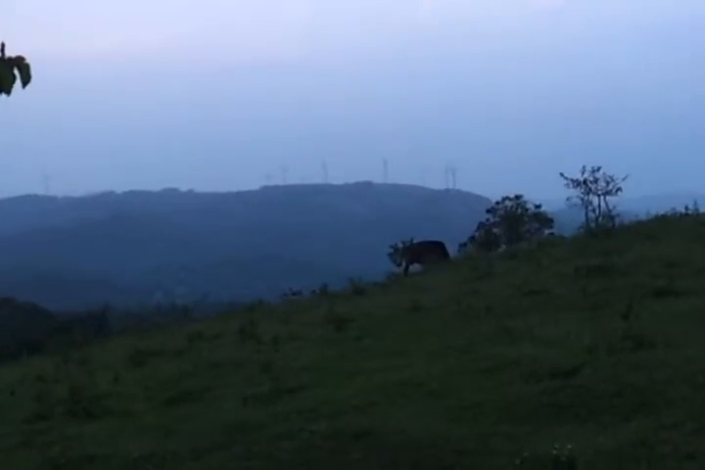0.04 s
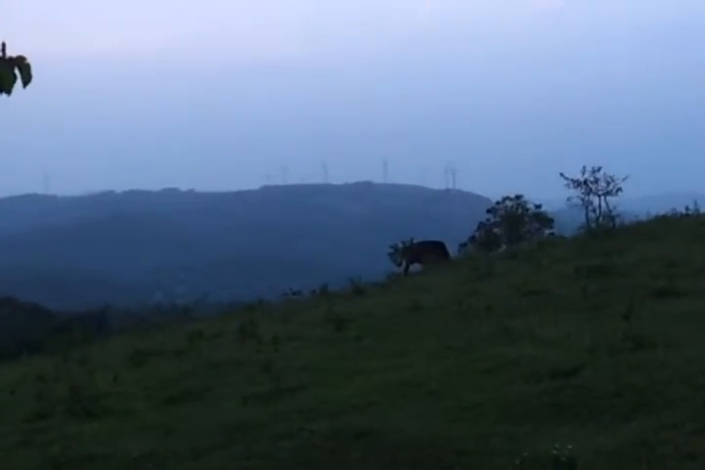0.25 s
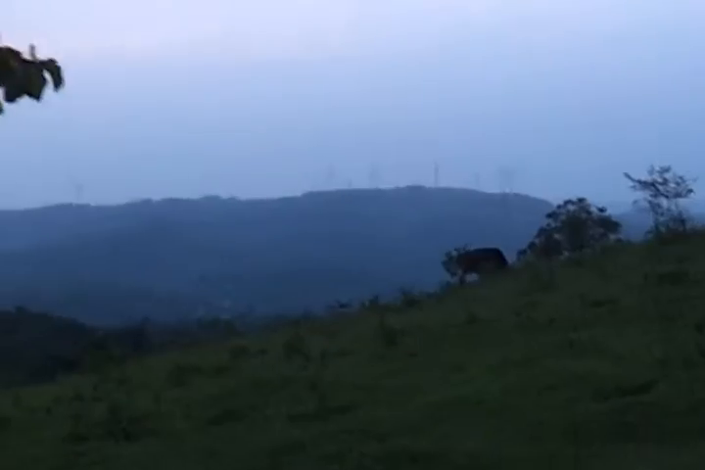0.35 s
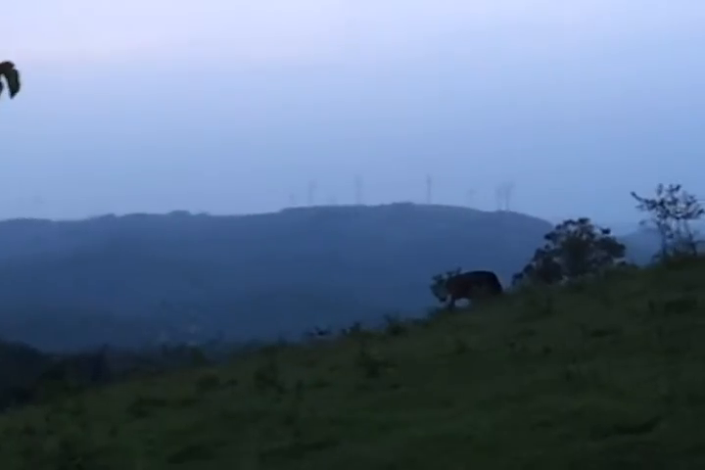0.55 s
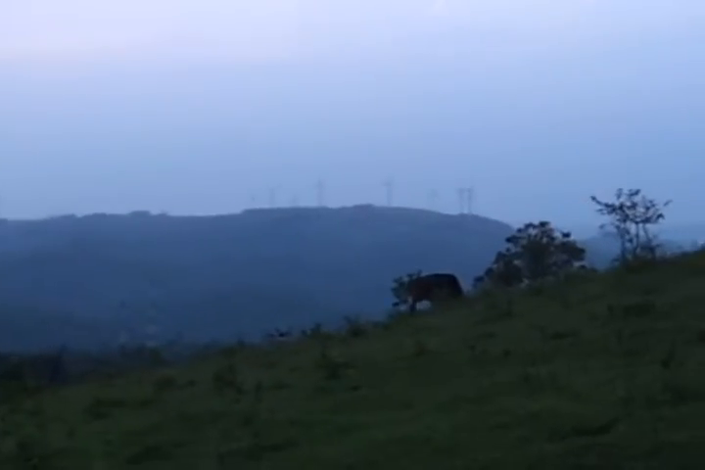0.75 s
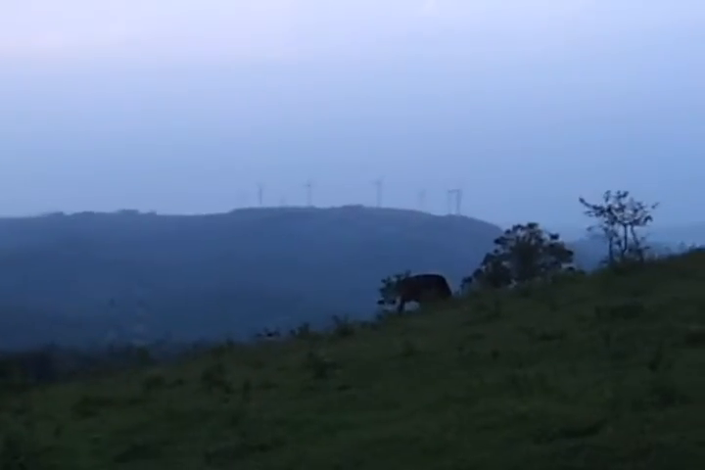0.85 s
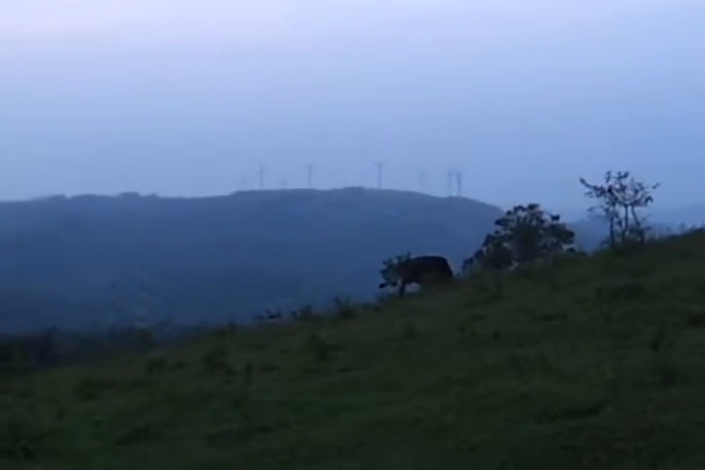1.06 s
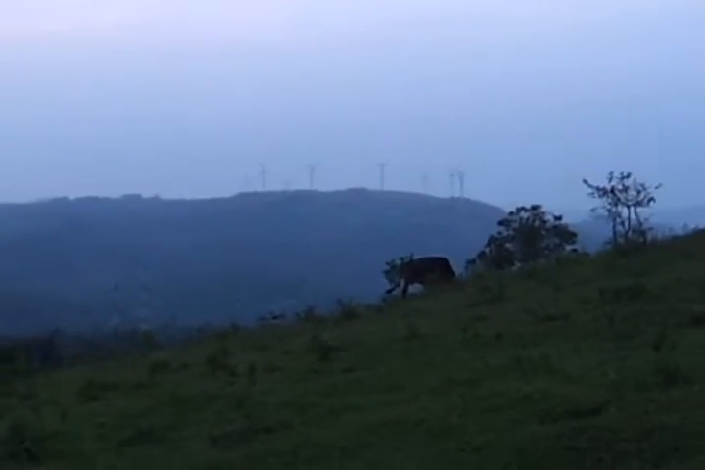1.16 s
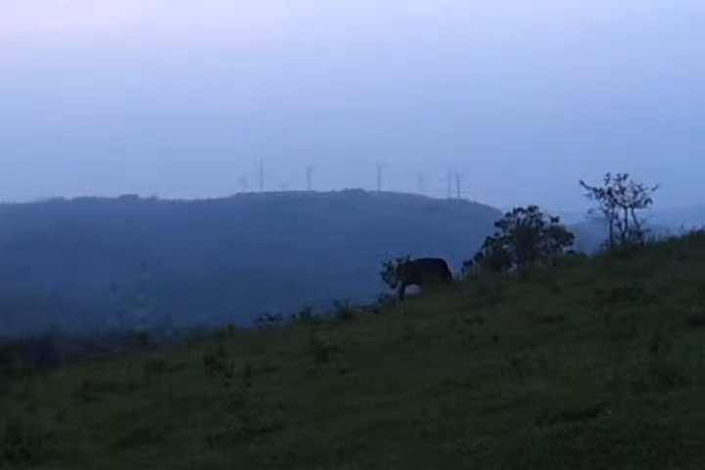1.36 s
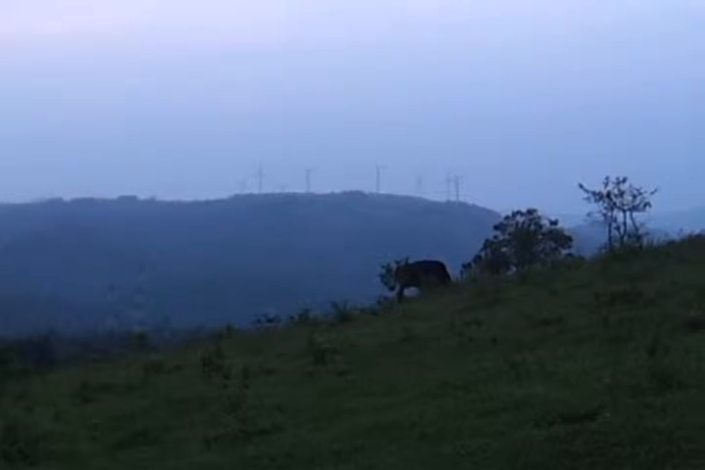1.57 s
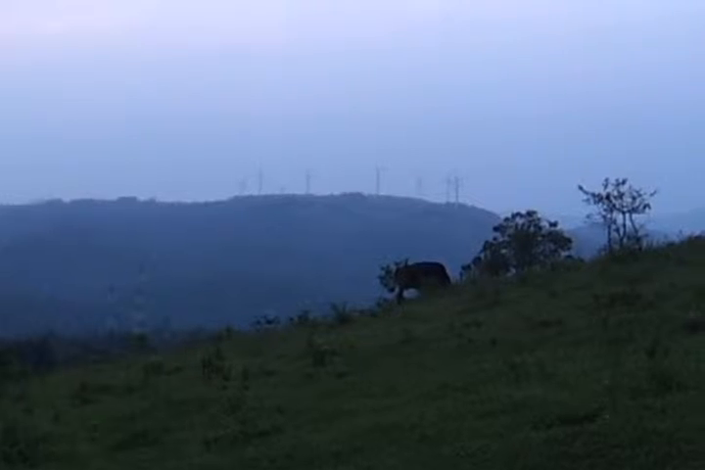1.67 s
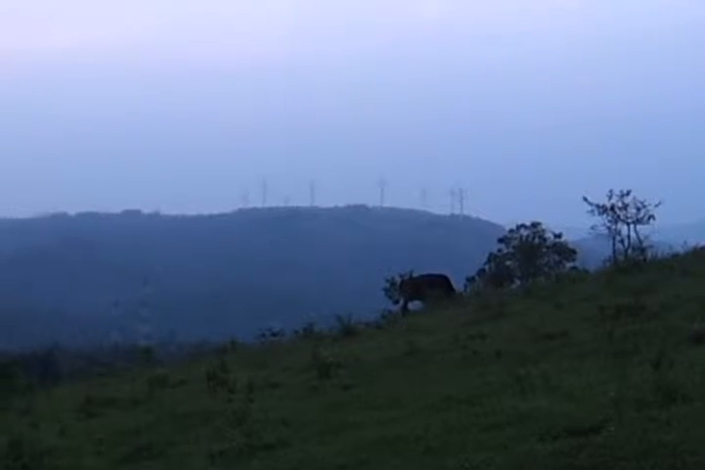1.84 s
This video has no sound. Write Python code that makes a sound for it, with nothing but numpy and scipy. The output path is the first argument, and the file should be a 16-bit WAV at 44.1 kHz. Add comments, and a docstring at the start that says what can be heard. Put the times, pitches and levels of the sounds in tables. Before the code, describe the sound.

Close handling noise on the right: a knock and a loud, short scrape of skin on the microphone, then light rubbing and case clicks. Behind it, outdoors at dusk, are faint cricket chirps, brief insect trills and a low hum.

```python
"""A hillside at dusk, heard from a hand-held camera. Over soft air and a far hum, insects trill and a
cricket chirps evenly, each wing stroke a short sagging tone. Up close the hand shifts with a rumble.
A finger bumps the right microphone port, drags across it with a loud hiss of catching skin, then
brushes it more lightly. The case clicks and rings a few times, and the grip crackles faintly."""
import sys
import numpy as np
from scipy import signal
from scipy.fft import rfft, irfft
from scipy.io import wavfile
from scipy.ndimage import uniform_filter1d

SR = 44100
rng = np.random.default_rng(int(sys.argv[2]) if len(sys.argv) > 2 else 0)


def wav_out(sig):
    """Save sig, one row per channel (or a flat mono array), as 16-bit PCM at SR to the path in sys.argv[1]."""
    wavfile.write(sys.argv[1], SR, np.round(np.clip(np.atleast_2d(sig).T, -1, 1) * 32767).astype(np.int16))


N = 83790


def amp(db):
    """Decibels to gain."""
    return 10 ** (np.asarray(db) / 20)


def unit(x):
    """Scales to rms 1."""
    return x / np.sqrt(np.mean(x ** 2) + 1e-20)


def read(points, hz):
    """Reads a curve on a log-frequency axis."""
    f, value = np.transpose(points)
    return np.interp(np.log(hz + 1), np.log(f + 1), value)


def add(mix, start, sound):
    """Mixes a sound in at a start time in seconds."""
    part = mix[..., max(round(start * SR), 0):][..., :sound.shape[-1]]
    part += sound[..., :part.shape[-1]]


def response(points, size=2048):
    """Minimum-phase impulse response of an EQ curve."""
    hz = abs(np.fft.fftfreq(size, 1 / SR))
    log_gain = np.log(amp(read(points, hz)))
    spectrum = np.exp(np.conj(signal.hilbert(log_gain)))
    return np.fft.ifft(spectrum).real[:size // 2]


def colour(x, points):
    """Runs a sound through an EQ curve."""
    return signal.oaconvolve(x, response(points))[:len(x)]


def wander(seconds):
    """Smooth random drift of rms 1 that changes over the given time."""
    hz = np.fft.rfftfreq(N, 1 / SR)
    return unit(irfft(rfft(rng.standard_normal(N)) / (1 + (2 * hz * seconds) ** 4), N))


# Tone of the air bed. Each row: frequency in Hz, relative level in dB.
AIR_EQ = [(20, -51.5), (40, -62), (80, -57.5), (150, -65.5), (300, -68.5), (550, -74), (900, -78.5),
          (1600, -78.5), (3500, -82), (5500, -81), (7800, -83.5), (10000, -89.5), (16000, -91.5)]
# Extra EQ on its right side. Each row: frequency in Hz, gain in dB.
AIR_RIGHT_EQ = [(60, -1), (400, -1), (3000, -1.5), (6000, 2), (7800, 3), (11000, 1), (16000, 1)]
# Its stereo image. Each row: frequency in Hz, left-right correlation from -1 to 1.
AIR_CORRELATION = [(60, 0.42), (130, -0.17), (300, 0.22), (3000, -0.092), (7000, -0.071), (12000, 0)]


def air(level_db=-49.5, patch_db=2):
    """A wide, soft outdoor wash of noise in which patches of the spectrum swell and fade."""
    frames, hz = N // 512 + 5, np.fft.rfftfreq(2048, 1 / SR)
    a, b, c, d, patches = np.moveaxis(rng.standard_normal((frames, len(hz), 5)), 2, 0)
    patches = uniform_filter1d(patches, size=6, axis=0)  # smooth over time
    patches = unit(uniform_filter1d(patches, size=20, axis=1))  # and over frequency
    left, independent = a + 1j * b, c + 1j * d
    alike = read(AIR_CORRELATION, hz)
    right = (alike * left + np.sqrt(1 - alike ** 2) * independent) * amp(read(AIR_RIGHT_EQ, hz))
    spectra = np.array([left, right]) * amp(read(AIR_EQ, hz) + patch_db * patches)
    _, wash = signal.istft(spectra.swapaxes(1, 2), nperseg=2048, noverlap=1536)
    return amp(level_db) * unit(wash[:, :N])


# Partials of the hum. Each row: frequency in Hz, level in dB.
HUM_PARTIALS = [(59.3, -58), (117.2, -58.5)]


def hum(waver_hz=2.135):
    """A far, low hum: two sines, each wavering in pitch on its own."""
    out = np.zeros(N)
    for hz, db in HUM_PARTIALS:
        pitch = hz + waver_hz * wander(0.12)
        out += amp(db) * unit(np.sin(2 * np.pi * np.cumsum(pitch) / SR))
    return out


def wing_stroke(length, hz, sag_hz, jitter, right_lead_s=0):
    """One stroke in stereo: a tone that sags as the wings slow and may reach the right port first."""
    progress = np.arange(0, length, 1 / SR) / length
    pitch = hz * (1 + jitter * rng.standard_normal()) - sag_hz * progress ** 2.25
    cycles = rng.random() + np.cumsum(pitch) / SR + np.outer([0, right_lead_s], pitch)
    envelope = np.sin(np.pi * progress ** 0.72) ** 0.76
    return envelope * np.sin(2 * np.pi * cycles)


# Insect trills. Each row: start in seconds, length in seconds, pitch in Hz,
# level at the top of the swell in dB, right-side trim in dB.
TRILL_CUES = [(0.021, 0.1014, 5820, -43, -9), (.13, 0.052, 6200, -54, 0), (1.268, .095, 6220, -57.5, 5),
              (1.566, .065, 6630, -59, 6)]


def trills(gap_s=0.0093, swell_db=18.5):
    """Insects play quick runs of wing strokes that swell and stop."""
    out = np.zeros((2, N))
    for start, length, hz, db, right_db in TRILL_CUES:
        for offset in np.arange(0, length, gap_s):
            gain = amp(db - swell_db * (1 - offset / length)) * amp([[0], [right_db]])
            add(out, start + offset, gain * wing_stroke(0.0078, hz, sag_hz=650, jitter=0.012))
    return out


# Cricket chirps. Each row: start in seconds, level in dB, right-side trim in dB
# (lower while the finger covers that port).
CHIRP_CUES = [(0.093, -40.5, -12), (.278, -43, -12), (.464, -39, -21), (.657, -38, -12), (.851, -40, -5),
              (1.037, -40, -4), (1.222, -38.5, -3.5), (1.415, -40, -4), (1.604, -40, -3.5),
              (1.796, -42, -2)]


def cricket(strokes=4, gap_s=0.0177, spread_db=1.3):
    """A cricket rubs its wings, a few slightly uneven strokes to each chirp."""
    out = np.zeros((2, N))
    for start, db, right_db in CHIRP_CUES:
        for k in range(strokes):
            gain = amp(db + spread_db * rng.standard_normal()) * amp([[0], [right_db]])
            stroke = wing_stroke(0.015, hz=5087, sag_hz=626, jitter=0.007, right_lead_s=87e-6)
            add(out, start + k * gap_s, gain * stroke)
    return out


# Hand moves. Each row: start in seconds, length in seconds, left level in dB, right level in dB.
SHIFT_CUES = [(.15, 0.065, -58, -38), (0.224, 0.1, -52, -36.5), (0.285, 0.24, -46, -49),
              (1.217, 0.1, -47, -54)]
# Tone of the rumble. Each row: frequency in Hz, relative level in dB.
RUMBLE_EQ = [(15, -1), (35, 3.5), (70, -1), (120, -10.5), (250, -23), (600, -45), (2000, -67)]


def hand_rumble():
    """Low noise swells and falls as the camera shifts in the hand."""
    envelope = np.zeros((2, N))
    for start, length, left_db, right_db in SHIFT_CUES:
        swell = np.sin(np.pi * np.arange(0, length, 1 / SR) / length)
        add(envelope, start, np.outer(amp([left_db, right_db]), swell))
    return envelope * [unit(colour(rng.standard_normal(N), RUMBLE_EQ)) for side in envelope]


# Fader moves of the long drag. Each row: time in seconds, then hiss, rasp and scuff levels in dB.
DRAG_FADERS = [(0.2244, -45, -51, -29), (0.228, -28.5, -27.5, -21.5), (.244, -25.5, -26, -19),
               (0.255, -19, -18, -19), (.272, -14.5, -17, -23), (0.283, -16, -22, -20.5),
               (.305, -15, -24.5, -27.5), (.374, -16.5, -29, -32), (.395, -23, -33, -34.5),
               (0.427, -15.5, -37.5, -39.5), (.457, -35.5, -46.5, -49.5), (.491, -34, -47, -48),
               (.499, -54.5, -64, -52.5), (.526, -46, -58, -56.5), (.583, -35.5, -44.5, -50.5),
               (.642, -37, -52, -48), (0.691, -39.5, -51.5, -54.5), (.713, -63, -69, -61)]
# Light brushes before and after it. Each row: start in seconds, length in seconds,
# then hiss, rasp and scuff levels in dB.
BRUSH_CUES = [(0.186, 0.077, -51, -55, -51.5), (0.726, 0.12, -47.5, -56, -53.5),
              (0.855, 0.066, -55, -73, -54.5), (0.901, 0.038, -48.5, -52.5, -49),
              (0.953, 0.054, -51, -57, -55.5), (1.0, 0.026, -50.5, -50.5, -50.5),
              (1.036, 0.031, -49.5, -55, -50.5), (1.144, 0.035, -48, -50.5, -45.5)]
# Tone of the high hiss, mid rasp and low scuff. Each row: frequency in Hz, relative level in dB.
HISS_EQ = [(2500, -16), (4300, -9.5), (5200, -14.5), (6100, -10), (7100, 0.5), (8200, -2.5), (9300, -8.5),
           (11000, -17), (13500, -19.5), (16000, -28)]
RASP_EQ = [(1200, -20), (2250, -24), (2650, -6), (3100, 0.5), (3700, 1.5), (4400, -15), (6000, -5),
           (9000, -72.5)]
SCUFF_EQ = [(25, -26), (90, -19.5), (190, -23), (310, -5.5), (450, 0), (560, -2), (720, -9), (1000, -11),
            (1300, -13.5), (1750, -12.5), (2200, -27), (5000, -51)]
# Bleed through the case to the left port. Each row: frequency in Hz, gain in dB.
BLEED_EQ = [(40, -20), (110, -25), (250, -37), (600, -50), (1300, -33), (2400, -15.5), (4400, -55),
            (8000, -42), (15000, -87)]


def finger_friction(slips_per_s=900, slip_share=0.15, grain_db=0.1, ramp_s=0.008, brush_fade_db=-12):
    """Skin catches and slips on the right port: grainy noise layered as hiss, rasp and scuff."""
    t = np.arange(N) / SR
    times, *faders_db = np.transpose(DRAG_FADERS)
    dragging = (t > times[0]) & (t < times[-1])
    grain = amp(grain_db * wander(0.0031))
    slips = unit((rng.random(N) < slips_per_s / SR) * rng.standard_normal(N))
    right = np.zeros(N)
    for layer, eq in enumerate([HISS_EQ, RASP_EQ, SCUFF_EQ]):
        level = amp(np.interp(t, times, faders_db[layer])) * dragging
        for start, length, *layer_db in BRUSH_CUES:
            age = np.arange(0, length, 1 / SR)
            ramps = np.minimum(np.minimum(age, length - age) / ramp_s, 1)
            add(level, start, ramps * amp(layer_db[layer] + brush_fade_db * (age / length) ** 2))
        rubbing = np.sqrt(1 - slip_share) * rng.standard_normal(N) + np.sqrt(slip_share) * slips
        right += level * unit(colour(grain * rubbing, eq))
    return np.array([colour(right, BLEED_EQ), right])


# Resonances of the case. Each row: frequency in Hz, relative level in dB, 60 dB decay time in seconds.
CASE_MODES = [(327, -8.5, 0.018), (468, 0, 0.015), (797, -5.5, 0.0061), (1300, -3.5, 0.0078)]


def case_ring(t):
    """The damped modes of the case after a push."""
    return sum(amp(db - 60 * t / t60) * np.cos(2 * np.pi * hz * t) for hz, db, t60 in CASE_MODES)


# Soft hits on the case. Each row: start in seconds, ring level in dB, thud level in dB,
# left-side trim in dB.
BUMP_CUES = [(0.1929, -24, -28.5, -32), (0.2084, -14, -17.5, -35), (0.2255, -15.5, -46, -36),
             (0.228, 2.5, -34, -36), (0.2308, -10.5, -11, -34), (1.2097, -35.5, -46, -6),
             (1.2235, -33, -35, -17), (1.2541, -49, -44, 10.5), (1.2865, -36.5, -42, -20),
             (1.5637, -50, -41.5, 8.5)]


def finger_bumps(contact_s=0.00074, ring_top_hz=1240, thud_hz=104, thud_t60_s=0.031):
    """The soft finger pad rounds off each push: a dull ring and a low thud."""
    out, t = np.zeros((2, N)), np.arange(4096) / SR
    attack = np.minimum(t / contact_s, 1)
    push = np.sin(np.pi * attack) ** 2
    ring = signal.fftconvolve(case_ring(t), push)[:len(t)]
    ring = signal.lfilter(*signal.butter(4, ring_top_hz, fs=SR), ring)
    ring /= abs(ring).max()
    thud = attack * amp(-60 * t / thud_t60_s) * np.sin(2 * np.pi * thud_hz * t)
    for start, ring_db, thud_db, left_db in BUMP_CUES:
        bump = amp(thud_db) * thud - amp(ring_db) * ring
        add(out, start, np.outer([amp(left_db), 1], bump))
    return out


# Tone of a tick. Each row: frequency in Hz, relative level in dB.
TICK_EQ = [(140, -48), (620, -9.5), (1310, -1.5), (1860, -11.5), (2450, -7.5), (3250, -5.5), (4250, -9),
           (6050, -10.5), (7450, 0), (9400, -9), (12100, -17), (14100, -20.5), (15900, -25)]


def bright_tick():
    """One sharp impulse, shaped by EQ and scaled to peak 1."""
    tick = response(TICK_EQ, size=8192)
    return tick / abs(tick).max()


# Sharp clicks. Each row: start in seconds, tick level in dB, ring level in dB, left-side trim in dB.
CLICK_CUES = [(0.2282, -6, -34, -20.5), (0.5745, -19, -36, -38), (0.9589, -39, -43, -13),
              (0.9708, -30, -42, -19), (1.037, -29, -47, -17), (1.0895, -23, -25.5, -12),
              (1.1513, -18.5, -23, -9), (1.4587, -7.5, -15, -17), (1.6534, -35.5, -43, -10),
              (1.843, -29.5, -47, -19)]
# Extra EQ on the left, the far side of the case. Each row: frequency in Hz, gain in dB.
FAR_SIDE_EQ = [(60, 6), (160, 11), (400, -8), (900, -15), (2400, 3), (4500, -9), (8000, -12), (15000, -36)]


def case_clicks(ring_band_hz=(200, 1450)):
    """The case clicks: a bright tick with a short ring of its modes."""
    out, tick = np.zeros((2, N)), bright_tick()
    ring = case_ring(np.arange(len(tick)) / SR)
    ring = signal.lfilter(*signal.butter(2, ring_band_hz, "bandpass", fs=SR), ring)
    ring /= abs(ring).max()
    for start, tick_db, ring_db, left_db in CLICK_CUES:
        click = amp(tick_db) * tick + amp(ring_db) * ring
        add(out, start, np.outer([amp(left_db), 1], click))
    out[0] = colour(out[0], FAR_SIDE_EQ)
    return out


def grip_crackle(start_s=0.94, end_s=1.88, snaps_per_s=80, softest_db=-46, spread_db=3.5):
    """Dry skin crackles under the grip: tiny random ticks, mostly on the right."""
    t = np.arange(N) / SR
    snaps = (rng.random(N) < snaps_per_s / SR) & (t > start_s) & (t < end_s)
    strength = amp(softest_db + spread_db * np.minimum(rng.exponential(1, N), 3))
    crackle = signal.oaconvolve(snaps * strength, bright_tick())[:N]
    return np.outer([0.3, 1], crackle)


def scene():
    """Close handling noise in front of the evening ambience."""
    handling = finger_friction() + finger_bumps() + case_clicks() + grip_crackle() + hand_rumble()
    return handling + cricket() + trills() + air() + hum()


def record(dry):
    """The hardest bump just overloads; then a steep high cut at 16.1 kHz."""
    high_cut = signal.firwin(511, 16100, window=("kaiser", 9), fs=SR)
    return signal.oaconvolve(np.clip(dry, -1, 1), high_cut[None], "same")


dry = scene()
out = record(dry)
wav_out(out)
```